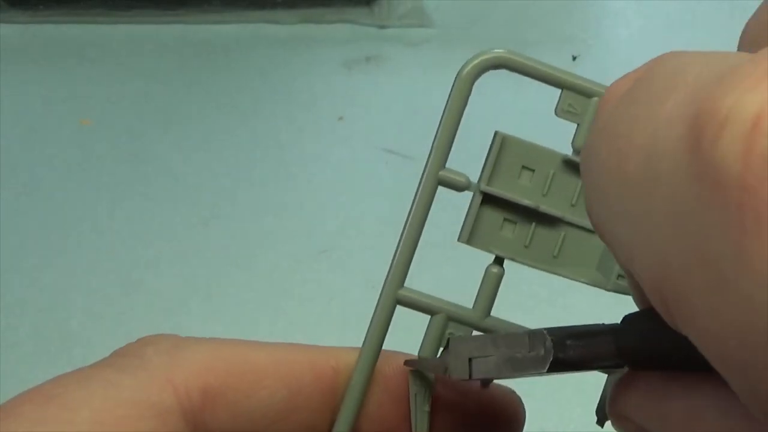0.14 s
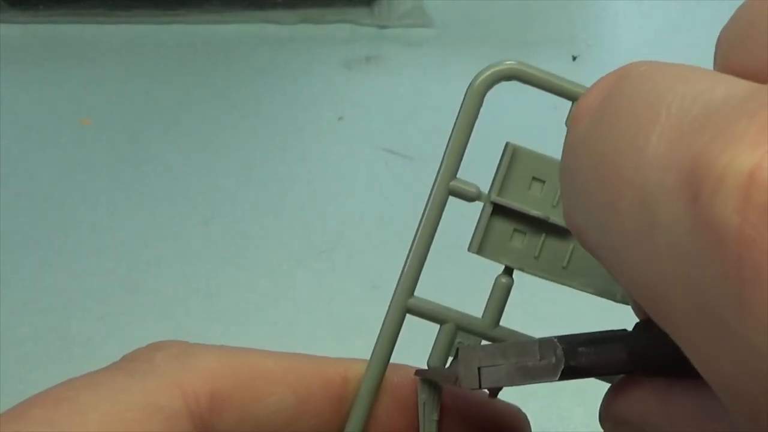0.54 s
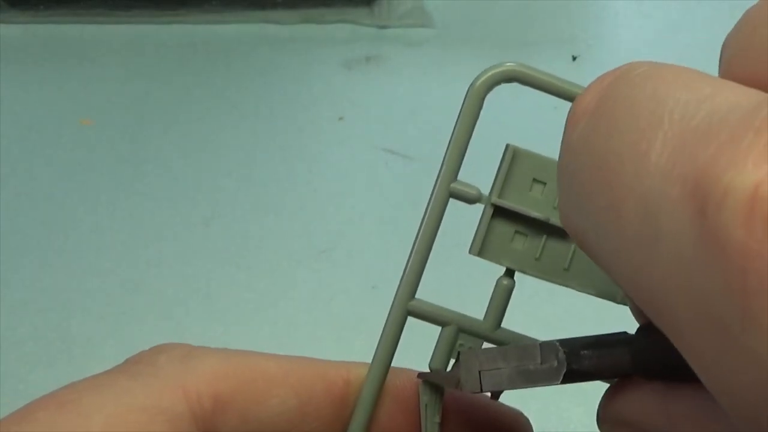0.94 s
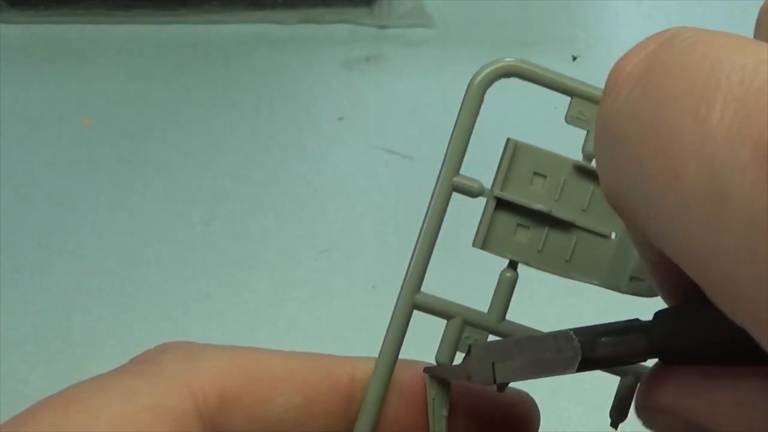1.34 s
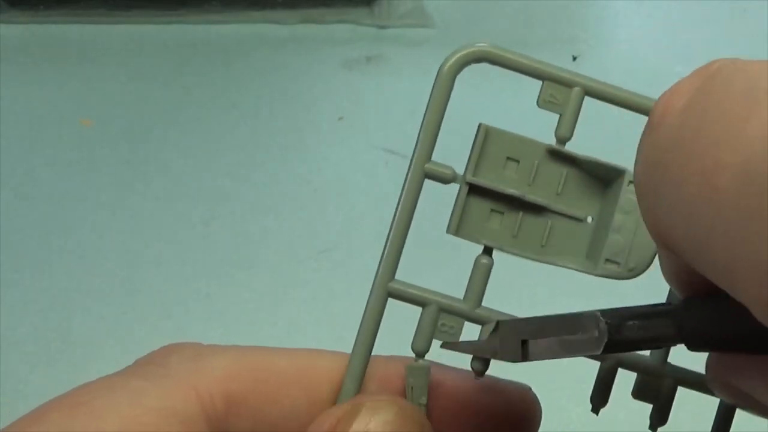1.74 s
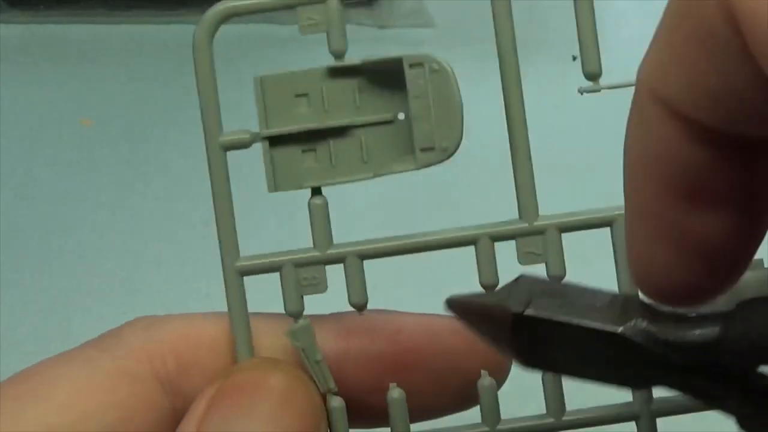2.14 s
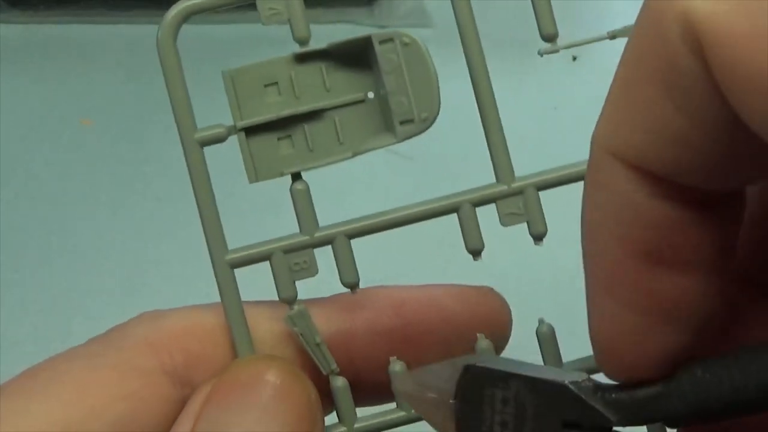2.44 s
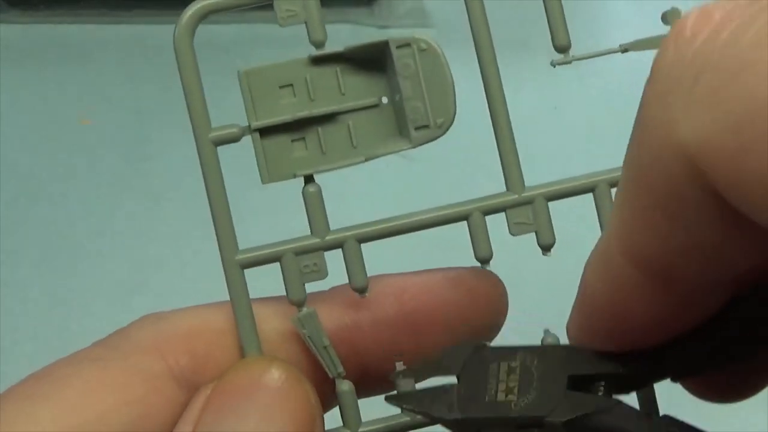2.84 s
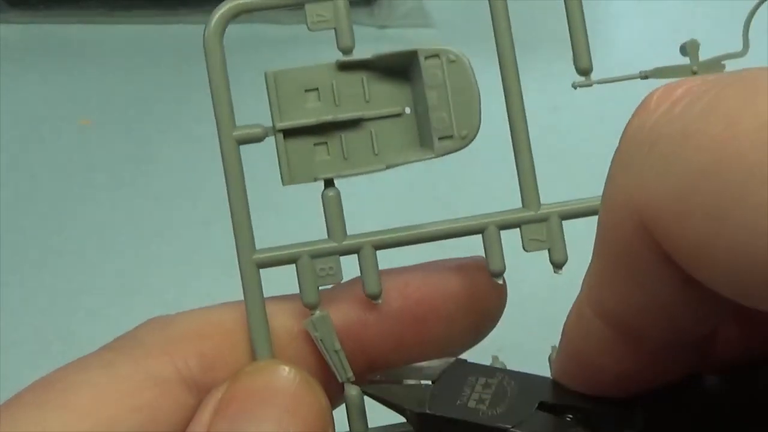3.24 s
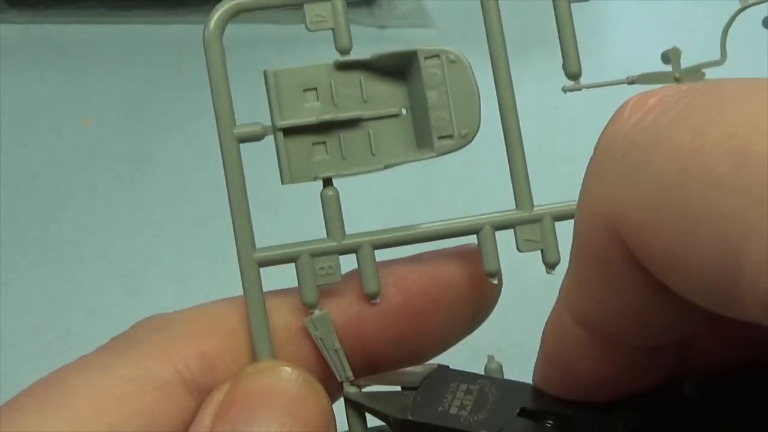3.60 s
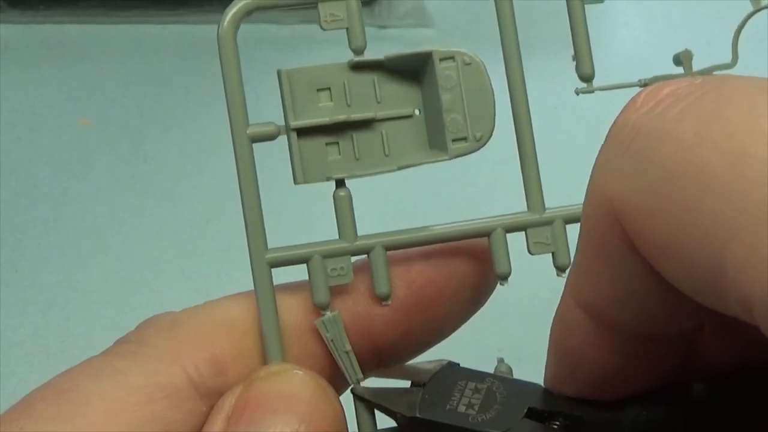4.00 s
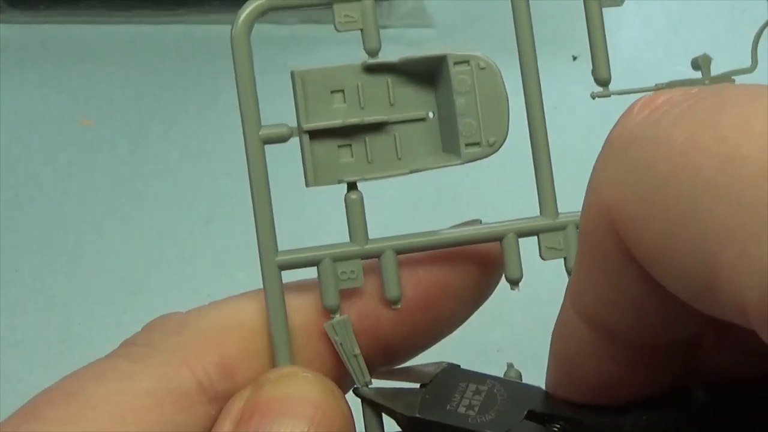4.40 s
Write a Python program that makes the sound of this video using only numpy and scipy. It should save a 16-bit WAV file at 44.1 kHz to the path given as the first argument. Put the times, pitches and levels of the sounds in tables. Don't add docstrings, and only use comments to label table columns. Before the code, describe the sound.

Close, dry plastic snaps at about one and a half and two seconds, then faint blade ticks, scrapes and a small creaky click near the end.

```python
import sys
import numpy as np
from scipy import signal
from scipy.fft import rfft, irfft
from scipy.io import wavfile
from scipy.ndimage import uniform_filter1d

SR = 44100
rng = np.random.default_rng(int(sys.argv[2]) if len(sys.argv) > 2 else 0)


def gain_from_decibels(decibels):
    exponent = np.asarray(decibels, float) / 20
    return 10 ** exponent


def master(y):
    cut = np.clip(np.atleast_2d(y).T, -1, 1)
    pcm = np.round(cut * 32767)
    wavfile.write(sys.argv[1], SR, pcm.astype(np.int16))


N = 201051
TIME = np.arange(N) / SR
TOP_LEAK_DB = -42

# f/Hz, level/dB, t60/s
FRAME_MODES = [(1400, -5, .012), (1750, -5, .01), (2100, 0, .014), (2600, -3, .01), (3070, -1, .012),
               (3450, -3, .01), (3800, -1, .014), (4300, -3, .01), (4750, -5, .012)]


def ring(x, modes, scatter, stretch=0.83):
    out = 0
    for (hz, db, t60), (level_chance, pitch_chance) in zip(modes, scatter):
        decay = np.log(1000) / (max(t60 * stretch, .002) * SR)
        turn = 2j * np.pi * hz * (1 + .012 * pitch_chance) / SR
        mode = signal.lfilter([1], [1, -np.exp(turn - decay)], x).imag
        out = out + gain_from_decibels(db + 1.8 * level_chance) * mode / np.abs(mode).max()
    no_bass = signal.butter(4, .8 * modes[0][0], "high", fs=SR, output="sos")
    out = signal.sosfilt(no_bass, out)
    return out / np.abs(out).max()


def add(track, s, x):
    i = int(s * SR)
    track[i:i + len(x)] += x[:N - i]


def tinted(x, points):
    hz, gain = np.transpose(points)
    log_hz = np.log(np.fft.rfftfreq(len(x), 1 / SR) + 1)
    return irfft(rfft(x) * np.interp(log_hz, np.log(hz), gain), len(x))


def unit(x):
    return x / np.sqrt(np.mean(x ** 2))


def fracture(out, s, crack_db, frame_db, ms, centre_hz):
    # f/Hz, level/dB, t60/s
    part_modes = [(5740, -37, .012), (5580, -19.5, 0.01), (6560, -10, .025), (7000, -1.5, .015),
                  (7740, -5, .012), (7790, 6.5, 0.01), (8230, 9, 0.0084), (8640, 3.5, 0.011),
                  (9060, 1, 0.012), (9380, -5.5, .015), (9860, -6, .015), (10220, -5.5, 0.01),
                  (11700, -19, .012)]
    # f/Hz, level/dB, t60/s
    hand_modes = [(558, -1, 0.011), (769, 2, 0.014), (885, -4.5, 0.015)]
    t = TIME[:5000]
    thud_db = frame_db - 16.5 - 1.5 * ms
    rise = 1 - np.exp(-t / .00025)
    crackle = np.exp(-t * 2000 / max(ms, .1))
    rattle = gain_from_decibels(-21) * np.sqrt(max(ms, .1)) * np.exp(-t / 0.0089)
    force = rise * (crackle + rattle)
    near = [(hz, db - 23.5 * abs(np.log2(hz / centre_hz)), t60) for hz, db, t60 in FRAME_MODES]
    for modes, db in ((part_modes, crack_db), (near, frame_db + 4.0), (hand_modes, thud_db + 5.0)):
        scatter = rng.standard_normal((16, 2))
        add(out, s, gain_from_decibels(db) * ring(force * rng.standard_normal(len(t)), modes, scatter))


def snaps():
    # t/s, crack peak level/dB, frame knock level/dB, crackle length/ms, knock centre f/Hz
    breaks = [(0.3498, -48, -40.5, 1.15, 2000), (0.9443, -29, -36.5, 3.9, 2220),
              (1.5487, -9.5, -32, 1.06, 2080), (1.5843, -36.5, -36, 0.48, 3080),
              (1.5967, -28, -40, 0.57, 3130), (1.7236, -22.5, -30.5, 1.4, 3110),
              (1.7723, -37, -41, 1.7, 2160), (1.7777, -25, -33.5, 2, 2990), (2.203, -18, -36.5, 4.2, 4020),
              (2.2081, -19.5, -35, 2.6, 3940), (2.2155, -19.5, -32, 0.57, 3570),
              (2.2163, -9, -35, 0.46, 3570), (2.2173, -6.5, -26.5, 0.68, 3570),
              (2.2187, -13.5, -36, 2, 2250), (2.2244, -35.5, -31.5, 19, 3760),
              (2.3042, -18.5, -38.5, 0.44, 3220), (2.376, -31.5, -44.5, 9.1, 3830),
              (4.4307, -27, -50, 1.5, 3940)]
    out = np.zeros(N)
    for s, crack_db, frame_db, ms, centre_hz in breaks:
        fracture(out, s, crack_db, frame_db, ms, centre_hz)
    return out


def splinters():
    # t/s, peak level/dB, length/ms
    bursts = [
        (1.548, -30.5, 0.24),
        (1.7232, -62, .2),
        (1.7372, -59, .2),
        (2.2058, -67, 0.18),
        (2.2152, -56.5, .3),
        (2.217, -57, 0.27),
        (2.2205, -57, .2),
        (2.226, -66, .2),
        (3.8288, -76, .2),
    ]
    out, t = np.zeros(N), TIME[:2000]
    top_octave = signal.cheby2(8, 70, (11000, 16900), "band", fs=SR, output="sos")
    for s, db, ms in bursts:
        burst = rng.standard_normal(len(t)) * np.exp(-t * 1000 / max(ms, .2))
        burst = signal.sosfilt(top_octave, burst)
        peak = np.abs(burst).max()
        add(out, s, gain_from_decibels(db - TOP_LEAK_DB) / peak * tinted(burst, [(11500, 1.5), (16000, 0.64)]))
    return out * gain_from_decibels(np.array([[-6], [3.5]]))


def bumps():
    # t/s, peak level/dB, f/Hz
    recoils = [
        (0.943, -44, 253),
        (0.946, -56, 90),
        (1.549, -51, 890),
        (1.605, -50.5, 335),
        (1.724, -45.5, 850),
        (1.779, -48.5, 734),
        (2.216, -43, 347),
    ]
    out, t = np.zeros(N), TIME[:5000]
    for s, db, hz in recoils:
        modes = [(0.78 * hz, -4, .04), (hz, 0, .05), (1.2 * hz, -3, .03)]
        add(out, s, gain_from_decibels(db) * ring(np.exp(-t / 0.00013), modes, np.zeros((3, 2))))
    return out


def ticks():
    # t/s, crack peak level/dB, frame knock level/dB, knock centre f/Hz
    touches = [(1.2809, -45.5, -56, 2220), (1.6515, -41, -53.5, 1820), (1.6625, -51, -62, 3090),
               (1.7878, -50, -59, 3083), (2.036, -48, -74, 2000), (2.82, -33, -59, 4160),
               (2.851, -30, -69, 3600), (2.8535, -34, -55, 4300), (2.8675, -32, -55, 3480),
               (3.8284, -36.5, -57, 3720), (3.8732, -42.5, -61, 2970), (3.9367, -60, -53.5, 1720),
               (3.9806, -53.5, -50, 3460), (4.1177, -47, -59, 2486)]
    out = np.zeros(N)
    for s, crack_db, frame_db, centre_hz in touches:
        fracture(out, s, crack_db, frame_db, 1, centre_hz)
    return out


def pings():
    # t/s, peak level/dB, upper modes level/dB, ring factor, lowest mode level/dB
    contacts = [
        (0.3582, -40.5, 2.5, 0.81, -2),
        (0.461, -43, 1, 0.9, 0),
        (0.8086, -41.5, -3, 0.72, -1),
        (0.8167, -49, 14, 0.57, -5),
        (1.337, -38.5, 7, 0.68, 7),
        (1.4778, -35, 7, 0.52, 6),
        (1.4953, -48, 3, 1.1, 6),
        (2.678, -40.5, 6.5, 0.95, 11),
        (3.8114, -37.5, 9.5, 0.67, -1),
    ]
    # f/Hz, level/dB, t60/s
    jaw_modes = [(4150, -12, .06), (6761, -5, .11), (7170, 0, .055), (7550, -15, .06), (8700, -12, .035),
                 (9390, -6, .08)]
    out, t = np.zeros(N), TIME[:6000]
    for s, db, upper_db, stretch, lowest_db in contacts:
        tick = rng.standard_normal(len(t)) * np.exp(-t / 0.00028)
        modes = []
        for hz, g, t60 in jaw_modes:
            upper = (hz > 8000) * (1 + (hz < 9000))
            modes.append((hz, g + upper_db * upper + lowest_db * (hz < 5000), t60))
        scatter = .2 * rng.standard_normal((len(jaw_modes), 2))
        add(out, s, gain_from_decibels(db) * ring(tick, modes, scatter, stretch))
    return out


def slips():
    strength_db = 3.16 * np.minimum(rng.exponential(size=N), 5)
    return rng.standard_normal(N) * (rng.random(N) < .15) * gain_from_decibels(strength_db)


def lumps():
    return gain_from_decibels(2.5 * unit(uniform_filter1d(rng.standard_normal(N), int(0.0053 * SR))))


def rubs():
    # t/s of strongest contact, build-up/s, let-go/s, bright level/dB, frame share level/dB
    strokes = [(1.185, 0.064, 0.065, -68, -2.5), (1.394, 0.049, 0.046, -65, 0),
               (1.712, .04, 0.0096, -56, -8), (1.737, .008, 0.036, -53.5, -7),
               (1.88, 0.069, 0.1, -65.5, -5.5), (2.045, 0.2, 0.049, -62, -6.5),
               (2.18, 0.15, 0.024, -67.5, -3), (2.55, .07, 0.016, -64, -10), (2.656, 0.05, 0.06, -63.5, -3),
               (2.81, 0.054, 0.046, -55.5, -10), (2.855, 0.041, 0.036, -43.5, -13.5),
               (2.879, 0.032, 0.033, -57.5, 6), (3.083, .015, 0.046, -70, -14),
               (3.396, 0.027, 0.014, -67, -12), (3.51, 0.042, 0.02, -63.5, -10),
               (3.811, 0.017, 0.054, -60, -9), (3.876, 0.015, 0.0092, -61, -4),
               (3.959, .05, 0.018, -65.5, -5), (4.43, 0.012, 0.0046, -45.5, -3),
               (4.457, 0.021, 0.018, -49.5, -3)]
    # f/Hz, width/Hz, level/dB
    resonances = [(6650, 220, -5), (7700, 200, -1), (8410, 220, 0), (9890, 180, -2), (10600, 200, -9)]
    bright = .13 * tinted(slips(), [(4500, 0), (6000, 1), (10500, 1), (12000, 0)])
    for hz, width, db in resonances:
        bright = bright + gain_from_decibels(db) * signal.lfilter(*signal.iirpeak(hz, hz / width, SR), slips())
    near = [(hz, -8 * abs(np.log2(hz / 3400)), t60) for hz, db, t60 in FRAME_MODES]
    frame = ring(slips(), near, np.zeros((len(near), 2)), .8)
    bright, frame = unit(bright * lumps()), unit(frame * lumps())
    out = np.zeros(N)
    for s, rise_s, fall_s, db, frame_db in strokes:
        span = slice(int((s - 2 * rise_s) * SR), int((s + 2 * fall_s) * SR))
        t = TIME[span] - s
        away = np.where(t < 0, t / rise_s, t / fall_s)
        contact = gain_from_decibels(db - 20 * away ** 2)
        out[span] += contact * (bright[span] + gain_from_decibels(frame_db) * frame[span])
    return out


def creaks():
    # t/s, length/s, f/Hz, peak level/dB
    squeezes = [
        (2.245, .025, 2200, -48),
        (2.84, .03, 1400, -56),
        (2.845, .03, 4300, -52),
        (2.878, .02, 1500, -53),
        (3.935, .02, 1550, -57),
        (3.937, .015, 3500, -58),
        (4.42, .02, 1400, -54),
        (4.421, .036, 770, -50.5),
        (4.445, .045, 2070, -57),
        (4.45, .03, 1370, -58),
    ]
    out, t = np.zeros(N), TIME[:6000]
    for s, length, hz, db in squeezes:
        push = np.sin(np.pi * np.minimum(t / length, 1)) * rng.standard_normal(len(t))
        add(out, s, gain_from_decibels(db) * ring(push, [(hz, 0, 0.03)], np.zeros((1, 2))))
    return out


def room(x):
    # f/Hz, level/dB, t60/s
    bands = [(305, -9.5, 0.35), (724, 0, 0.75), (2000, -5.5, 0.34), (5150, -9, 0.34), (9560, -17, 0.31)]
    t, out = TIME[:30000], []
    for _ in range(2):
        tail = 0
        for k, (hz, db, t60) in enumerate(bands):
            only_this = [(f, 1. * (j == k)) for j, (f, *_) in enumerate(bands)]
            band = tinted(rng.standard_normal(len(t)), only_this)
            fade = np.exp(-np.log(1000) * t / t60) + 2.13 * np.exp(-t / 0.0052)
            tail = tail + gain_from_decibels(db) * band * fade * np.sqrt(14 / (t60 * SR))
        out.append(signal.fftconvolve(x, tail * (t > .0006))[:N])
    return out[0] + 0.53 * out[1] * np.array([[1], [-1]])


def lens():
    # start t/s, end t/s, f/Hz, level/dB
    runs = [
        (0, 2.3, 3030, -63),
        (2.3, 2.85, 2950, -61.5),
        (3.97, 4.56, 2780, -58),
    ]
    out, t = np.zeros(N), TIME[:600]
    for start in np.arange(.0165, N / SR, .04):
        pitch_chance, level_chance = rng.standard_normal(2)
        for first, last, hz, db in runs:
            if first <= start < last:
                tone = np.sin(2 * np.pi * hz * (1 + .015 * pitch_chance) * t)
                blip = tone * t / .002 * np.exp(1 - t / .002)
                add(out, start, gain_from_decibels(db - 4 * abs(level_chance)) * blip)
    return out


def hum():
    # f/Hz, level/dB
    lines = [(50, -70), (150, -70.5), (250, -76.5), (350, -82), (750, -84.5)]
    out = 0
    for k, (hz, db) in enumerate(lines):
        waver = unit(uniform_filter1d(rng.standard_normal(N), 4000))
        tone = np.sin(2 * np.pi * (hz * TIME + rng.random()))
        out = out + gain_from_decibels(db + 3 + .7 * k * waver) * tone
    return out


def hiss():
    # f/Hz, density level/dB per Hz
    spectrum = [(22, -9.5), (32, -19.5), (42, -32), (65, -6), (100, -17), (135, -2.5), (175, -8.5),
                (250, -6), (320, -9), (600, -10.5), (800, -10.5), (1100, -13), (3000, -17), (7250, -21),
                (11200, -25)]
    # f/Hz, coherence
    likeness = [(60, 0.95), (130, .95), (290, 0.77), (640, 0.15), (1400, 0.14), (3100, 0.4), (6800, 0.56),
                (11000, 0.76)]
    # t/s, swell level/dB
    air = [
        (0, 5),
        (.5, 6),
        (1.1, 2.5),
        (1.6, 2),
        (2.1, 6.5),
        (2.6, 4),
        (3.2, 3),
        (3.8, 1.1),
        (4.2, 4),
        (4.56, 3),
    ]
    mid, side = (tinted(rng.standard_normal(N), [(hz, gain_from_decibels(db)) for hz, db in spectrum]) for _ in range(2))
    mid = tinted(mid, [(hz, np.sqrt(1 + 0.77 * np.clip(c, 0, 1))) for hz, c in likeness])
    side = tinted(side, [(hz, np.sqrt(1 - np.clip(c, 0, 1))) for hz, c in likeness])
    pair = unit(np.array([mid + side, mid - side]))
    low = signal.sosfilt(signal.butter(2, 1500, fs=SR, output="sos"), pair)
    swell_db = np.interp(TIME, *np.transpose(air))
    stirred = low * gain_from_decibels(swell_db) + (pair - low) * gain_from_decibels(-0.2 + 0.6 * swell_db)
    return gain_from_decibels(-63.5) * stirred


def scene():
    work = snaps() + bumps() + ticks() + pings() + rubs() + creaks()
    direct = work * gain_from_decibels(np.array([[-.15], [.15]]))
    return direct + room(work) + splinters() + lens() + hum() + hiss()


def roll_off(x):
    return signal.sosfilt(signal.butter(12, 16460, fs=SR, output="sos"), x)


def record(dry):
    steep = signal.ellip(10, .1, 60, 11000, fs=SR, output="sos")
    kept = signal.sosfiltfilt(steep, dry)
    mix = kept + gain_from_decibels(TOP_LEAK_DB) * (dry - kept)
    return roll_off(mix)


dry = scene()
out = record(dry)
master(out)
```